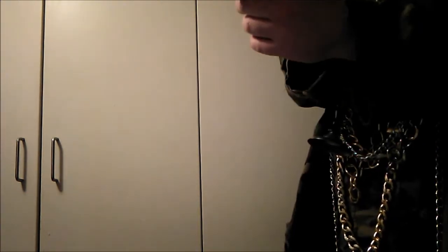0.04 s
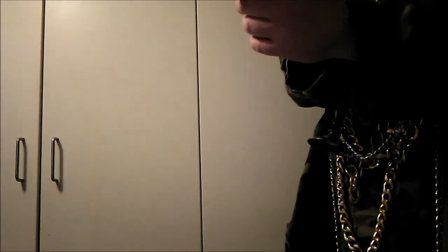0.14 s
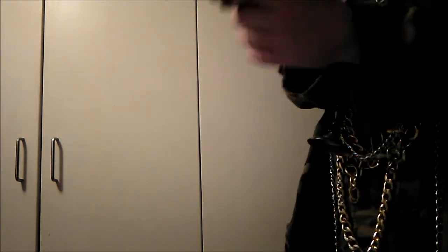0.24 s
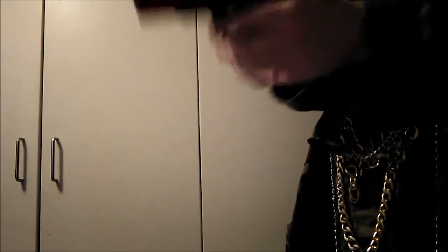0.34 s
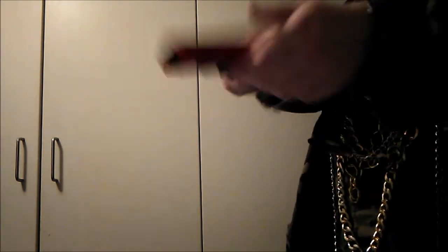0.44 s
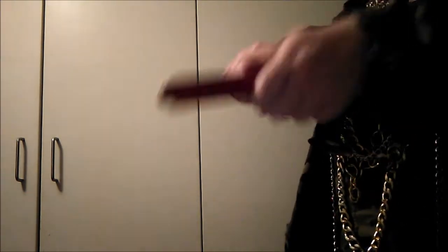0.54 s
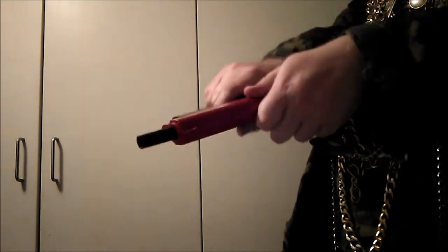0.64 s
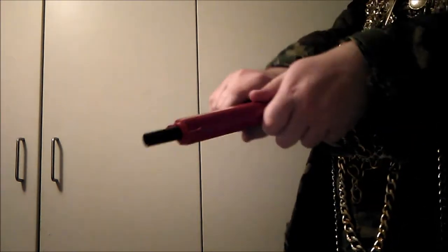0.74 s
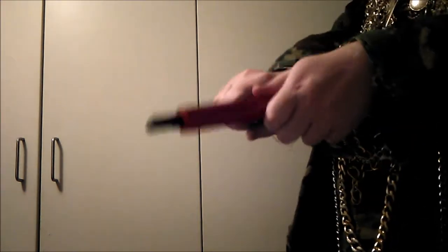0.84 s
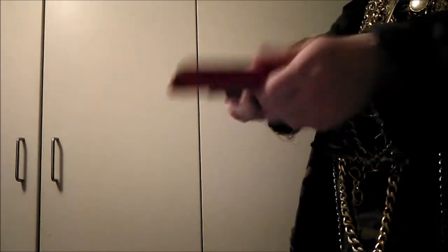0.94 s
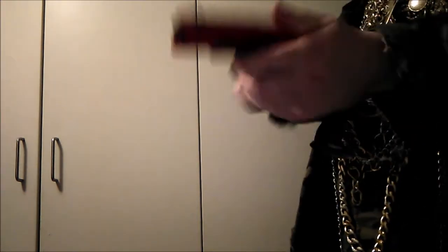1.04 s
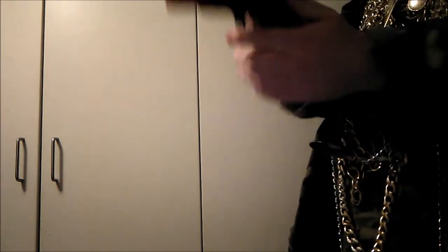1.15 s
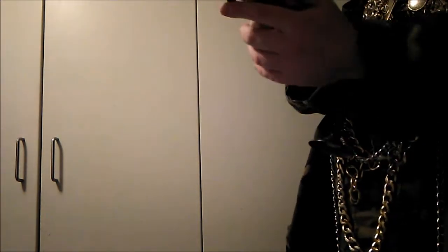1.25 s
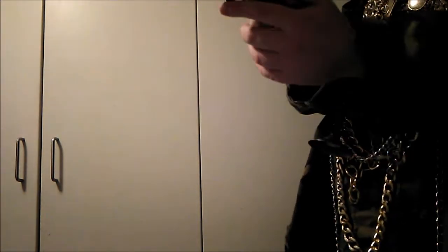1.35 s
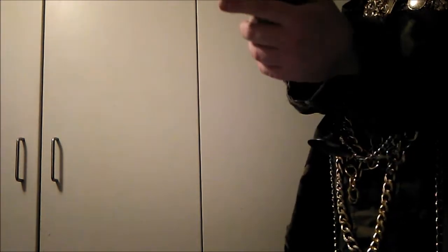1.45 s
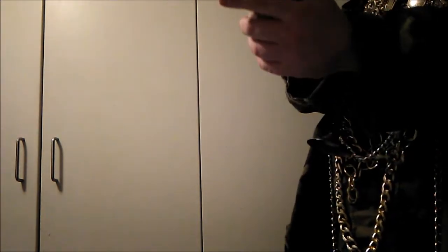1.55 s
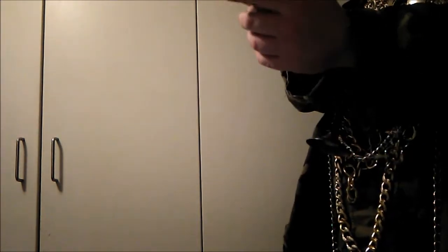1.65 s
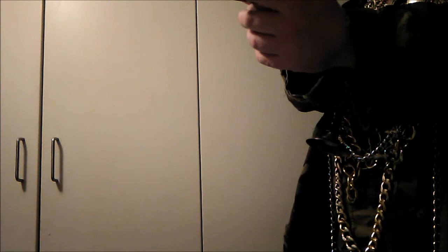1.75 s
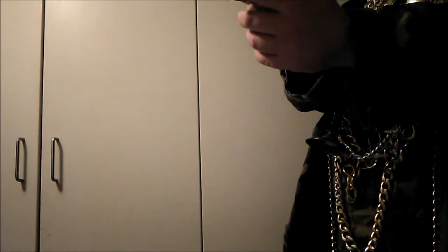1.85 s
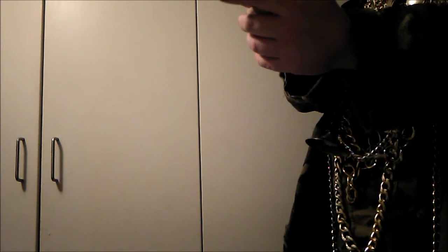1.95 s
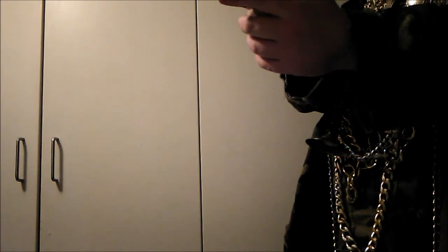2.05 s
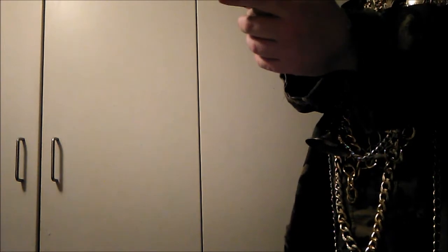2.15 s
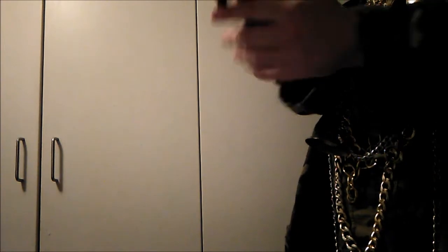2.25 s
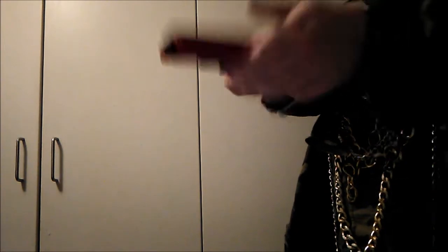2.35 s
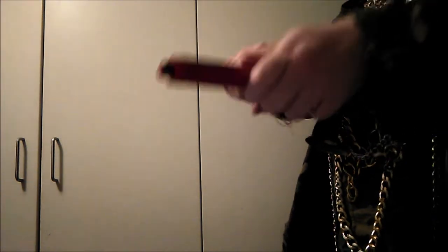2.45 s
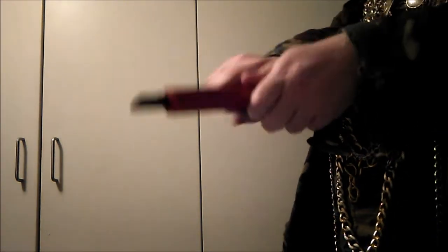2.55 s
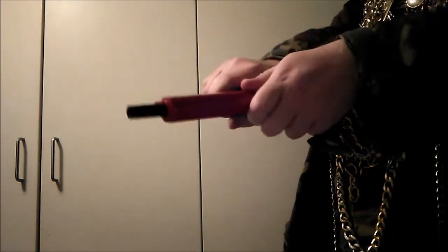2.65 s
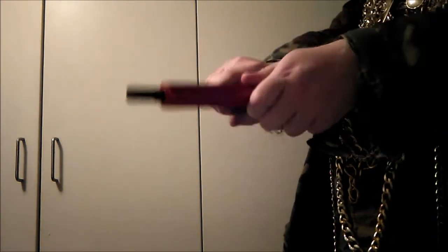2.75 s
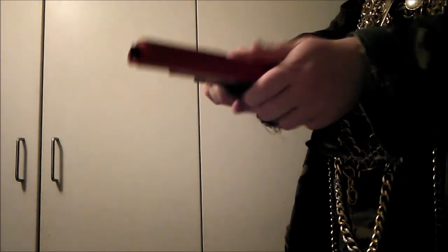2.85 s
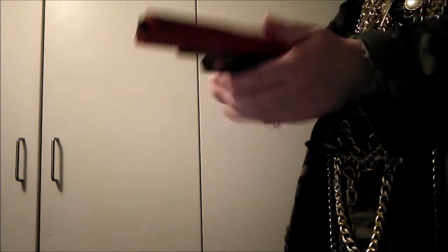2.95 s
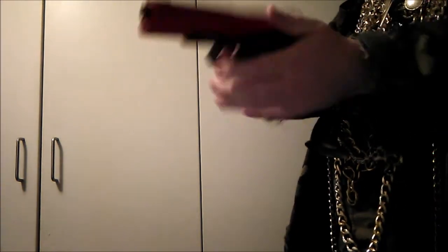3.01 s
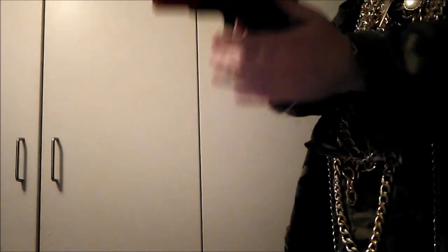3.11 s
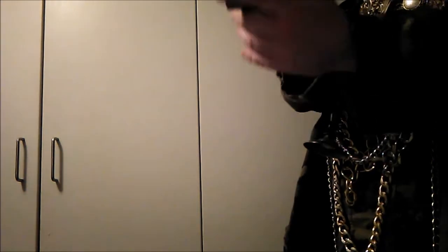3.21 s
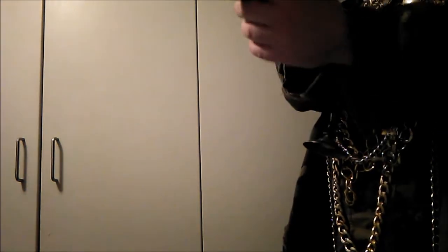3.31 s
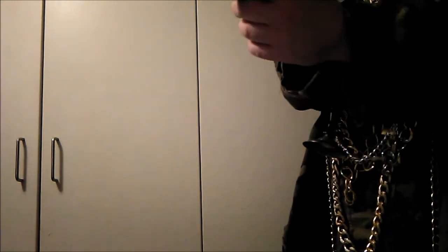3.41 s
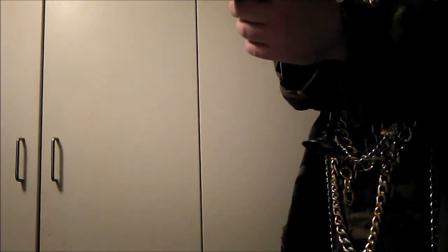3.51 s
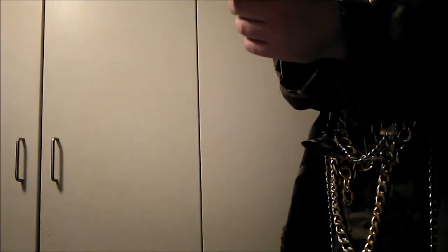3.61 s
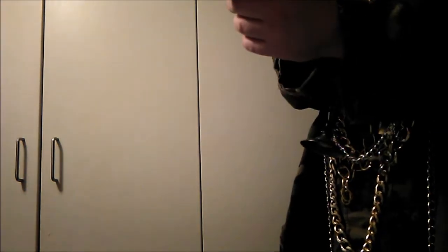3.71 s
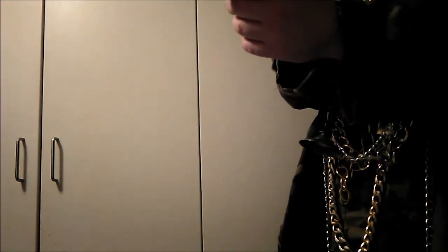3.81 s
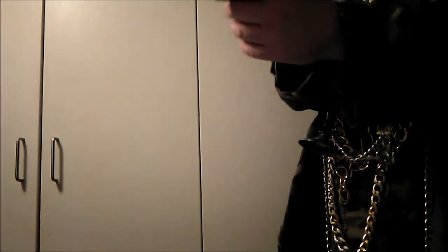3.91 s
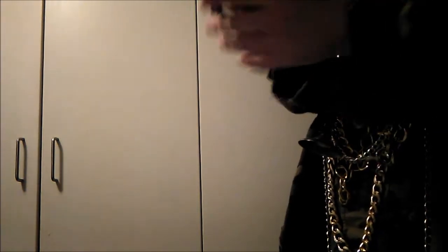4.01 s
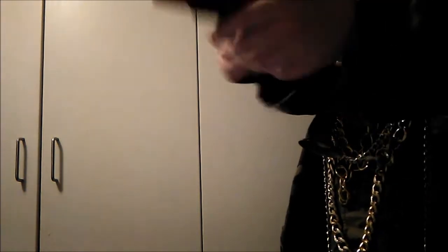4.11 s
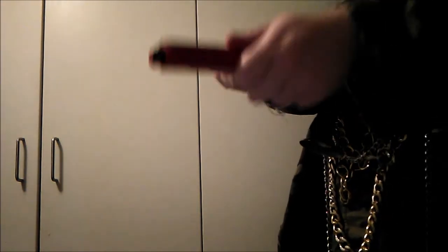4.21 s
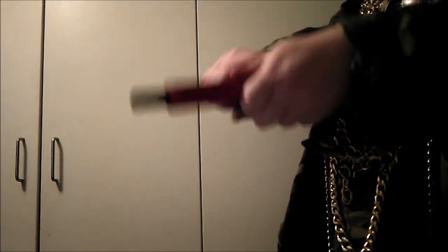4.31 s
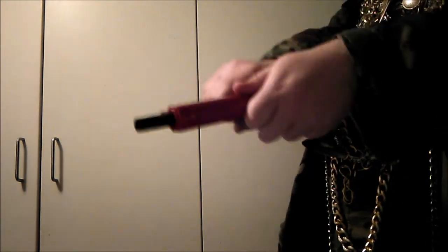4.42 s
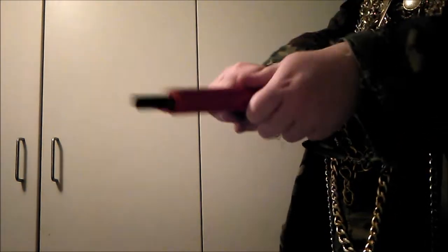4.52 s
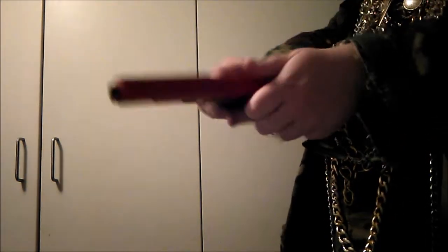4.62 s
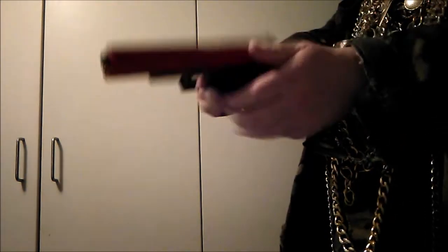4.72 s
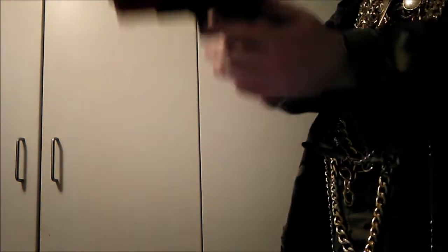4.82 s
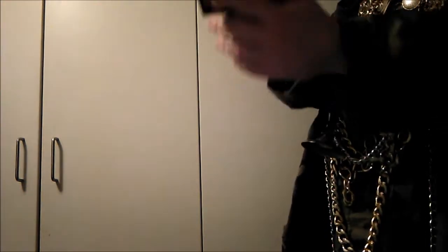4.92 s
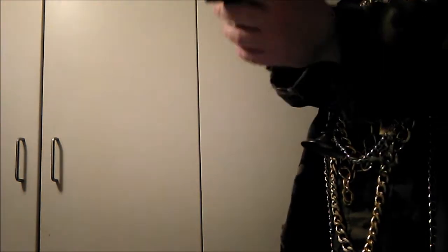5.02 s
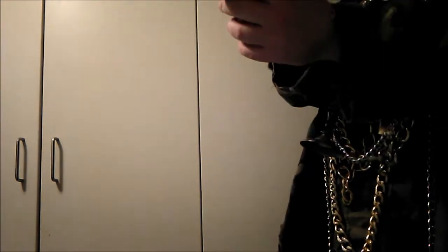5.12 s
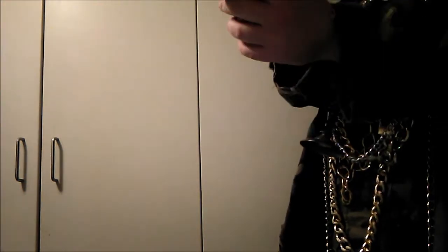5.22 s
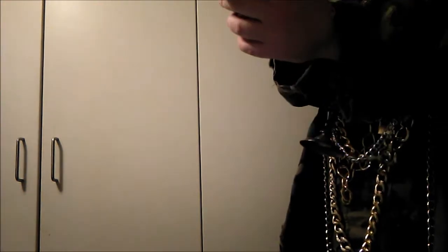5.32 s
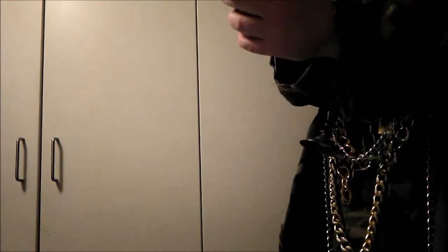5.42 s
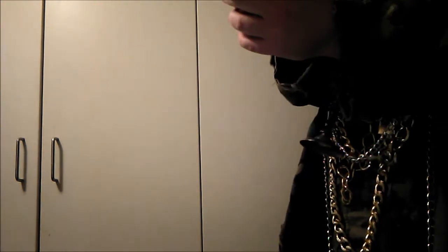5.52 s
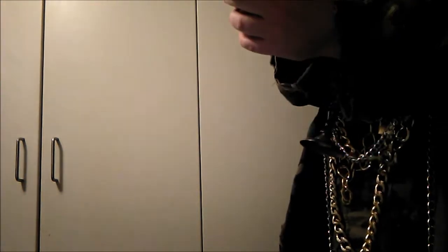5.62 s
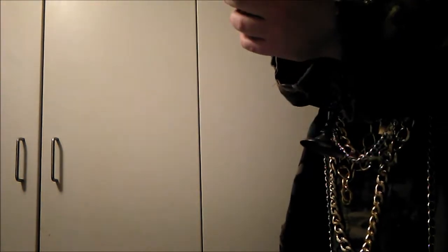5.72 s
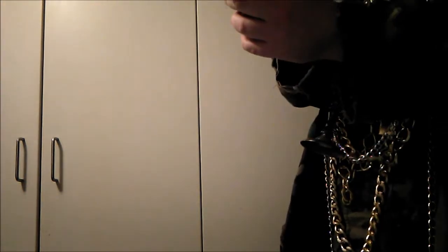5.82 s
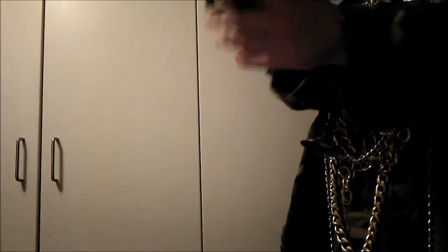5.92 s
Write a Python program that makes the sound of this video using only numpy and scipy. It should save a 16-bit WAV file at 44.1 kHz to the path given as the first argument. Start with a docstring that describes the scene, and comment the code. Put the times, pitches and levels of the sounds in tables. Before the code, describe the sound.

In a small quiet room, a plastic spring pistol is fired and cocked by hand close to a stereo pair; the gun is bright on the right, muffled on the left. Shots come at about 0.26, 2.07, 3.91 and 5.79 s: each a very short, hard rasping slam with an air puff and a tiny rising pop. About 70 ms later the pellet cracks on a panel, with a brief low thud and a more roomy tail. Between shots come blunt grip knocks, finger rubs and small rattles. The slide scrapes back and latches sharply near 0.71, 2.67 and 4.42 s, then runs home at 1.0 s, softly, and at 2.94 and 4.67 s with strong clacks. A thin spring ring follows some of these, clearest near 2.94 s. Sleeves rustle around each cocking; faint hiss, low rumble and slight hum remain. The last shot ends the scene.

```python
"""Spring airsoft pistol in a small room

Four shots are heard, with the slide cocked by hand between them. Each shot is a piston slam of coloured grains
with a puff of air and a gliding pop; the pellet's crack and the struck panel's modes follow some 70 ms later.
The plastic slide scrapes by stick and slip, latches and clatters home as bursts of noise that ring its shell.
Hands, cloth, low rumble, hum and steady noise lie beneath; a room tail, two microphones and a limiter follow."""
import sys
import numpy as np
from scipy import signal
from scipy.fft import rfft, irfft, next_fast_len
from scipy.io import wavfile
from scipy.ndimage import uniform_filter1d

SR = 44100
rng = np.random.default_rng(int(sys.argv[2]) if len(sys.argv) > 2 else 0)


def to_wav(sig):
    """Store sig (one row per channel, or 1-D mono) as 16-bit WAV at the path in sys.argv[1].

    Samples outside -1..1 are clipped; the rate is SR.
    """
    pcm = np.clip(np.atleast_2d(sig), -1, 1) * 32767
    pcm = np.round(pcm).astype(np.int16)
    wavfile.write(sys.argv[1], SR, pcm.T)  # frames by channels


N = 262836
TIME = np.arange(N) / SR   # s
BRIEF = TIME[:8192]   # time axis of one short event, s

# All levels in the tables are relative.
# piston slams: t/s, level/dB, stroke/s, tilt/(dB per octave), air puff/dB
SHOTS = [(0.2556, 4.5, 0.0058, 0.16, 13), (2.0688, 9.5, .0065, 1, 6.5), (3.9148, 6, .0068, 0, -11.5),
         (5.7934, 5.5, 0.0059, 0.5, 14.5)]
# slide pulled back to its latch: start t/s, latch t/s, final rail level/dB, rise on the way/dB,
# catch/dB, latch/dB, jolt/dB
PULLS = [(0.637, 0.7145, -28, 14, -26, -1, -19.5), (2.613, 2.672, -27.5, 19, -14.5, 1, -24.5),
         (4.359, 4.418, -28, 14.5, -13.5, 0, -29.5)]
# slide running home: start t/s, stop t/s, final rail level/dB, rise on the way/dB, clatter/dB,
# stop/dB, stop chatter/s, tilt/(dB per octave), shell/dB, jolt/dB
RETURNS = [(0.933, 1.004, -29, 24.5, -22, -16, 0.0062, -1.5, -32, -51),
           (2.911, 2.9396, -27.5, 13, -9, 13, 0.0012, 1.5, -33.5, -8.5),
           (4.639, 4.666, -21.5, 7.5, -9.5, 8, .0022, 3.5, -31.5, -21)]
# spectrum of the plastic slide's contacts: f/Hz, density level/dB
SLIDE_COLOUR = [(60, -42), (150, -21), (300, -31), (550, -19), (900, -8), (1600, -1.5), (2600, 0),
                (4000, -1.5), (6200, 0), (9500, 3.5), (11700, -4), (15000, -18)]
# modes of the slide's hollow shell: f/Hz, level/dB, t60/s
SHELL_MODES = [(650, -20, 0.059), (830, -7.5, .05), (940, -13, 0.04), (1420, -7, .045), (1970, 0, .05),
               (2190, 0, 0.061), (2593, -2.5, .04)]
# room sound at the left microphone, which faces away: f/Hz, level against the right/dB
SHADE_ROOM = [(100, -6.5), (500, 0), (1000, -1.5), (1600, -5), (2500, -8), (4000, -12.5), (9000, -14),
              (14000, -13)]
TICK_S = 0.0014   # chatter of a loose part


def from_db(db):
    """Amplitude ratio: twenty decibels are a factor of ten."""
    return 10 ** (np.asarray(db) / 20)


def at_hz(points, hz):
    """Logarithmic pitch scale: a table is read linearly in log frequency."""
    known, values = np.transpose(points)
    return np.interp(np.log(np.maximum(hz, 1)), np.log(known), values)


def add(track, s, sound):
    """Superposition: a sound is summed into a track at a time in seconds."""
    start = max(round(s * SR), 0)
    track[..., start:start + sound.shape[-1]] += sound[..., :N - start]


def colour(x, points, tilt=0, keep_power=True):
    """Minimum-phase filtering: the folded cepstrum of a tilted spectrum gives a causal response."""
    size = 2 * next_fast_len(x.shape[-1] // 2 + 2048)
    hz = np.arange(size // 2 + 1) * SR / size
    # the tilt acts mostly above 700 Hz
    gain = from_db(at_hz(points, hz) + tilt * np.log2(1 + hz / 700))
    if keep_power:
        gain = gain / np.sqrt(np.mean(gain ** 2))
    cepstrum = irfft(np.log(gain))
    cepstrum[1:size // 2] *= 2
    cepstrum[size // 2 + 1:] = 0
    response = np.exp(rfft(cepstrum))
    return irfft(rfft(x, size) * response)[..., :x.shape[-1]]


def grains(envelope, uneven_db):
    """Dense random collisions: uneven impulses carry the energy of the envelope."""
    sizes = from_db(uneven_db * rng.standard_normal(len(envelope)))
    hits = envelope * rng.standard_normal(len(envelope)) * sizes
    return hits * np.sqrt(np.sum(envelope ** 2) / np.sum(hits ** 2))


def burst(envelope, uneven_db):
    """Directional interference: row 0 is one direction, row 1 the mean of all, its notches filled in."""
    hits = grains(envelope, uneven_db)
    energy = np.sum(hits ** 2)
    spectrum = rfft(hits, 2 * len(hits))
    even = irfft(spectrum / np.sqrt(np.abs(spectrum) ** 2 + energy / 10))[:len(hits)]
    return np.array([hits, even * np.sqrt(energy / np.sum(even ** 2))])


def ring(x, modes):
    """Modal resonance: a drive is convolved with exponentially decaying sines."""
    t = TIME[:SR // 2]
    response = sum(from_db(db - 60 * t / t60) * np.sin(2 * np.pi * hz * t) for hz, db, t60 in modes)
    return signal.fftconvolve(x, response)[:N]


def chatter(length, rise):
    """Dissipative contact: the envelope of two parts that meet and buzz to rest."""
    return (1 - np.exp(-BRIEF / rise)) * np.exp(-(BRIEF / length) ** 1.1)


def wander(t, step_s):
    """Random modulation: lines join normal values of zero mean and unit spread, one per step."""
    values = rng.standard_normal(256)
    return np.interp(t / step_s, np.arange(len(values)), values)


def contact(db, length, tilt):
    """Impact noise: two plastic parts meet and chatter, 4 dB above the level given."""
    return from_db(db + 4) * colour(burst(chatter(length, rise=0.00094), uneven_db=5), SLIDE_COLOUR, tilt)


def rustle_db():
    """Incoherent addition: powers of the arm movements sum as each swells, holds and dies away."""
    # arm movements around each cocking and to take aim: t/s, length/s, rustle/dB
    moves = [(0.476, .25, -60.5), (1.05, .15, -62.5), (1.82, 0.61, -70), (2.42, .33, -59),
             (2.99, 0.16, -56.5), (3.35, 0.68, -72), (4.164, 0.81, -58.5), (5.598, .08, -73.5)]
    attack_s, release_s, still_db = .06, 0.13, -81
    power = from_db(still_db) ** 2
    for s, length, db in moves:
        before = np.maximum(s - TIME, 0) / attack_s
        after = np.maximum(TIME - s - length, 0) / release_s
        power = power + (from_db(db) * np.exp(-before - after)) ** 2
    return 10 * np.log10(power)


def hush():
    """Stationary noise: independent coloured noise at each microphone, 3 dB lower on the left."""
    # background spectrum: f/Hz, density level/dB
    hush_colour = [(20, -10), (70, -1.5), (150, 0.5), (260, -5), (520, -10.5), (1000, -14.5), (2500, -21),
                   (6000, -23.5), (15000, -25.5)]
    noise = colour(rng.standard_normal((2, N)), hush_colour)
    return from_db(-66) * noise * from_db([[-3], [0]])


def rumble():
    """Partial coherence: low noise, much alike at the two microphones, grows with movement."""
    # low pressure swells: f/Hz, density level/dB
    rumble_colour = [(20, -9.5), (45, -3.5), (75, 2), (120, -11.5), (220, -14.5), (1000, -50)]
    shared, own = rng.standard_normal(N), rng.standard_normal((2, N))
    moving_db = rustle_db()
    # the level follows a share of the rustle's swing
    level_db = -75 + 0.13 * (moving_db - moving_db.mean())
    return from_db(level_db) * colour(shared + .4 * own, rumble_colour)


def hum():
    """Amplitude modulation: a faint 68 Hz tone wavers and swells after each closing of the slide."""
    swell_after_s, swell_s = 0.12, .15
    swell = sum(np.exp(-((TIME - stop - swell_after_s) / swell_s) ** 2) for _, stop, *_ in RETURNS)
    level_db = -80.5 + 10 * swell + 7 * wander(TIME, step_s=0.6)
    return from_db(level_db) * np.sin(2 * np.pi * 68 * TIME)


def sleeves():
    """Friction noise: cloth rubs softly as the arms move."""
    # cloth spectrum: f/Hz, density level/dB
    cloth_colour = [(60, 0), (300, 0.5), (800, 1), (2800, 4.5), (6000, -1.5), (9700, 2), (15000, -11.5)]
    return colour(grains(from_db(rustle_db()), uneven_db=1.0), cloth_colour)


def faint_ticks(spread_db, tilt):
    """Random point process: tiny rattles come at 9 per second, with the strength of the movement."""
    born = rng.random(N) < 9 / SR
    over_cloth_db = 17
    sizes = born * from_db(rustle_db() + over_cloth_db + spread_db * rng.uniform(-1, 1, N))
    envelope = np.abs(signal.fftconvolve(sizes, chatter(TICK_S, rise=0.00083))[:N])
    return colour(envelope * rng.standard_normal(N), SLIDE_COLOUR, tilt)


def loose_parts():
    """Impact noise: loose parts tick as the gun is turned."""
    # ticks: t/s, level/dB, tilt/(dB per octave)
    ticks = [(0.4978, -33.5, -5.5), (0.5066, -39.5, -3), (0.841, -34, -4), (2.395, -32.5, 0.5),
             (2.4, -27.5, -1), (2.828, -36, -1.5), (3.150, -38, -2), (3.598, -37, -3), (4.170, -28, -2),
             (4.536, -29, -3), (4.5897, -34, 7), (4.901, -40, 11), (4.954, -38, 5)]
    out = np.zeros((2, N))
    for s, db, tilt in ticks:
        add(out, s, contact(db, TICK_S, tilt))
    return out


def finger_rubs():
    """Friction noise: fingers stroke the plastic with a half-sine envelope."""
    # rubs: t/s, length/s, level/dB, tilt/(dB per octave)
    rubs = [(0.596, 0.039, -49, 13), (2.42, .04, -42.5, 6), (2.446, 0.029, -46.5, -5.5),
            (3.121, 0.088, -46, 20), (4.167, 0.042, -39, 0), (4.915, 0.04, -55.5, 5)]
    out = np.zeros((2, N))
    for s, length, db, tilt in rubs:
        stroke = np.sin(np.pi * np.minimum(BRIEF / length, 1))
        add(out, s, from_db(db) * colour(burst(stroke, uneven_db=1), SLIDE_COLOUR, tilt))
    return out


def grips():
    """Impulsive excitation: hands knock bluntly, the palm thuds and the hollow shell rings."""
    # knocks: t/s, level/dB, chatter/s, tilt/(dB per octave), shell/dB, palm thud/dB
    knocks = [(0.6295, -20.5, .0028, -2, -45.5, -57.5), (1.249, -42, .016, -9, -44.5, -50),
              (1.794, -59.5, .022, -13, -60, -59.5), (2.344, -52, .0067, -7, -61, -72),
              (2.564, -33, .005, -6, -48, -57), (2.614, -36.5, .005, -4, -55.5, -67),
              (2.775, -38.5, .0042, -3.5, -56, -68.5), (2.85, -55.5, .011, -22, -60.5, -69),
              (4.227, -43.5, .013, -6.5, -63, -44.5), (4.26, -42.5, .008, -2.5, -62, -52),
              (4.315, -43, .0055, -6, -56.5, -63)]
    # dull palm spectrum: f/Hz, density level/dB
    palm_colour = [(60, -12), (160, -2), (260, 2.5), (500, -4), (900, -15.5), (3000, -40.5)]
    out, blows = np.zeros((2, N)), np.zeros(N)
    for s, db, length, tilt, shell_db, palm_db in knocks:
        add(out, s, contact(db, length, tilt))
        thud = burst(chatter(length=0.012, rise=0.0012), uneven_db=2.5)
        add(out, s, from_db(palm_db) * colour(thud, palm_colour))
        add(blows, s, from_db([shell_db]))
    return out + ring(blows, SHELL_MODES)


def springs():
    """Free vibration: coil springs, under load or as the slide closes, sing thin wavering tones."""
    # twangs: t/s, f/Hz, level/dB, t60/s
    twangs = [(.714, 1502, -56, .7), (2.672, 1502, -52.5, .8), (2.937, 2775, -34.5, 0.44),
              (4.499, 1520, -51.5, 0.4)]
    out, t = np.zeros(N), TIME[:SR]
    for s, hz, db, t60 in twangs:
        level_db = db - 60 * t / t60 + 4 * wander(t, step_s=0.016)
        onset = 1 - np.exp(-t / 0.012)
        add(out, s, from_db(level_db) * onset * np.sin(2 * np.pi * hz * t))
    return out


def jolts(hz, decay_s):
    """Damped oscillation: a hard stop of the slide shoves the gun in the hands, one low swing."""
    out = np.zeros(N)
    for _, s, *_, db in PULLS + RETURNS:
        add(out, s, from_db(db) * np.sin(2 * np.pi * hz * BRIEF) * np.exp(-BRIEF / decay_s))
    return out


def scrape(length, last_db, swell_db):
    """Stick-slip friction: the slide grates along its rails, louder as it goes."""
    rise_db = np.interp(BRIEF, [0, length], [last_db - swell_db, last_db])
    force_db = rise_db + 0.5 * wander(BRIEF, step_s=0.00091)
    release = np.exp(-np.maximum(BRIEF - length, 0) / 0.0055)
    return colour(burst(from_db(force_db) * release, uneven_db=3.5), SLIDE_COLOUR, tilt=-2.5)


def slide_back():
    """Friction-driven resonance: the pull scrapes, catches and latches; the scraping rings the shell."""
    # three catches of the piston on its way to the sear: time before the latch/s
    catches_before_latch = [.027, .0182, .0108]
    rails, out = np.zeros((2, N)), np.zeros((2, N))
    for start, latch, rail_db, swell_db, catch_db, latch_db, _ in PULLS:
        add(rails, start, scrape(latch - start, rail_db, swell_db))
        for early in catches_before_latch:
            add(out, latch - early, contact(catch_db, length=0.0011, tilt=-.5))
        add(out, latch, contact(latch_db, length=0.0023, tilt=3.8))
    return out + rails + ring(from_db(-50) * rails[1], SHELL_MODES)


def slide_home():
    """Impulsive excitation: the slide scrapes, clatters and stops; every blow rings its shell."""
    # blows on the guides: share of the time from start to stop
    clatter_shares = [.36, .57, .77]
    out, blows = np.zeros((2, N)), np.zeros(N)
    for start, stop, rail_db, swell_db, clatter_db, stop_db, length, tilt, shell_db, _ in RETURNS:
        add(out, start, scrape(stop - start, rail_db, swell_db))
        for share in clatter_shares:
            s = start + share * (stop - start)
            add(out, s, contact(clatter_db, 0.0032, tilt))
            add(blows, s, from_db([-43.5]))
        add(out, stop, contact(stop_db, length, tilt))
        add(blows, stop, from_db([shell_db]))
    return out + ring(blows, SHELL_MODES)


def frame_ring(x):
    """Modal resonance: the gun's sound drives short ringing of its plastic frame."""
    # frame modes: f/Hz, level/dB, t60/s
    frame_modes = [(440, -50.5, 0.027), (577.6, -55.5, 0.21), (995, -52.5, 0.031), (1397, -57.5, 0.067),
                   (1592, -56.5, 0.2), (1960, -58.5, 0.21), (2270, -56.5, 0.064), (2660, -60.5, 0.13),
                   (3420, -54.5, 0.071), (4505, -56.5, .08), (5000, -58, 0.094), (9100, -55, 0.031),
                   (9400, -50.5, 0.08)]
    return ring(x, frame_modes)


def pellet():
    """Impact and modal response: the pellet crumples into the target and its panel thuds."""
    # impacts: t/s, crack/dB, crumple/s, tilt/(dB per octave), thud/dB
    impacts = [(0.325, -9, 0.0062, 1.1, -28), (2.137, -24.5, 0.012, -1, -17), (2.1433, -9, 0.0041, 8, -24),
               (3.9817, -13.5, .0015, -0.5, -40), (3.987, -7, 0.0063, 0.26, -29.5),
               (5.8656, -8.5, 0.0054, 4, -30.5)]
    # crack spectrum: f/Hz, density level/dB
    crack_colour = [(60, -40), (150, -2.5), (270, -5), (600, -2.5), (950, 0.5), (1500, 3), (2700, 6.5),
                    (4200, 0.5), (7000, -2), (9700, 3.5), (11700, -6), (15000, -22)]
    # panel modes: f/Hz, level/dB, t60/s
    panel_modes = [(227.7, -21, 0.3), (260, -7.5, 0.1), (364, -5.5, 0.035), (443, -23, .05),
                   (556, -14.5, 0.065)]
    crack, push = np.zeros((2, N)), np.zeros(N)
    for s, db, crumple, tilt, thud_db in impacts:
        crumpling = burst(chatter(crumple, rise=0.0019), uneven_db=4)
        add(crack, s, from_db(db) * colour(crumpling, crack_colour, tilt))
        add(push, s, from_db([thud_db]))
    return crack + ring(push, panel_modes)


def rebounds(delay_s, rebound_db, length, tilt):
    """Elastic rebound: the piston bounces on its spring and taps again after each shot."""
    out = np.zeros((2, N))
    for s, *_ in SHOTS:
        add(out, s + delay_s, contact(rebound_db, length, tilt))
    return out


def muzzle_pop(first_hz, last_hz, glide_s, decay_s, pop_db):
    """Air-column oscillation: air leaving the barrel swings for a few quickening cycles."""
    out = np.zeros(N)
    hz = np.interp(BRIEF, [0, glide_s], [first_hz, last_hz])
    phase = 2 * np.pi * np.cumsum(hz) / SR
    swell = (BRIEF / decay_s) ** 2 * np.exp(-BRIEF / decay_s)
    for s, db, *_ in SHOTS:
        add(out, s, from_db(db + pop_db) * swell * np.sin(phase))
    return out


def piston():
    """Friction, impact and flow: the piston rasps to a dead stop and air swells from the muzzle."""
    # piston spectrum: f/Hz, density level/dB
    piston_colour = [(60, -20), (140, 0), (240, 5.5), (340, -5.5), (460, -1.5), (700, -6), (980, -3.5),
                     (1500, -6), (2600, -5.5), (4800, 3), (7000, -3), (9500, 3.5), (11700, -5.5),
                     (15000, -16)]
    slam, air = np.zeros((2, N)), np.zeros(N)
    for s, db, stroke, tilt, air_db in SHOTS:
        rasp = 1 - np.exp(-BRIEF / 0.00058)
        stop = np.exp(-np.maximum(BRIEF - stroke, 0) / .001)
        add(slam, s, from_db(db) * colour(burst(rasp * stop, uneven_db=-3), piston_colour, tilt))
        puff = (1 - np.exp(-BRIEF / 0.00029)) * np.exp(-BRIEF / 0.002)
        add(air, s + stroke, -from_db(air_db) * puff)
    # no steady pressure passes the high-pass, so the puff swings back
    return slam, signal.sosfilt(signal.butter(1, 75, "high", fs=SR, output="sos"), air)


def room(x, build_s):
    """Diffuse reverberation: reflections thicken, then die band by band, apart at each microphone."""
    # wall return: f/Hz, level/dB
    wall_colour = [(60, -8.5), (250, -8), (500, 1.5), (1000, 4), (2000, 2.5), (4000, 1), (9000, -0.5),
                   (15000, 0.5)]
    # decay: f/Hz, t60/s
    decay_times = [(100, 0.17), (500, 0.21), (1500, 0.2), (4000, 0.26), (9000, 0.23), (15000, .2)]
    t = TIME[:SR // 2]
    white = rfft(rng.standard_normal((2, len(t))))
    hz = np.arange(white.shape[1]) * SR / len(t)
    edges = np.append(0, np.geomspace(150, SR / 2, 12))
    tail = np.zeros((2, len(t)))
    for low, high in zip(edges, edges[1:]):
        band = irfft(white * ((hz >= low) & (hz < high)), len(t))
        tail += band * from_db(-60 * t / at_hz(decay_times, (low + high) / 2))
    tail = tail * (1 - np.exp(-t / build_s))
    tail = tail / np.sqrt(np.sum(tail ** 2, axis=1)[:, None])
    left, right = colour(tail, wall_colour, keep_power=False)
    left = colour(left, SHADE_ROOM, keep_power=False)
    return np.array([signal.fftconvolve(x, side)[:N] for side in (left, right)])


def scene():
    """Direct and reverberant fields: the pistol is near and mostly dry, the target far and reverberant."""
    # direct sound at the left microphone, which faces away: f/Hz, level against the right/dB
    shade_direct = [(100, -13.5), (300, -8.5), (500, -6), (1000, -5.5), (1600, -11.5), (2500, -17),
                    (4000, -23), (9000, -23), (14000, -32)]
    slam, air = piston()
    gun = slam + rebounds(delay_s=.057, rebound_db=-25, length=0.0036, tilt=-1)
    gun = gun + slide_back() + slide_home() + jolts(hz=129, decay_s=0.001)
    gun = gun + grips() + finger_rubs() + loose_parts() + faint_ticks(spread_db=4, tilt=0)
    gun, gun_all_round = gun + frame_ring(gun[1]) + springs()
    impact, impact_all_round = pellet()
    cloth = sleeves()
    pop = muzzle_pop(first_hz=251, last_hz=1126, glide_s=0.0018, decay_s=0.0013, pop_db=-9.0)

    near = gun + cloth * from_db(-0.5)
    shaded = colour(near, shade_direct, keep_power=False) + colour(impact, SHADE_ROOM, keep_power=False)
    # the left lags by 7 samples; the puff reaches the right only, the pop both alike
    direct = np.array([np.roll(shaded, 7), near + impact + air]) + pop
    radiated = from_db(-10.0) * gun_all_round + from_db(-25) * pop
    radiated = radiated + from_db(3.5) * impact_all_round + from_db(-2.0) * cloth
    return direct + room(radiated, build_s=0.0017) + hush() + rumble() + hum()


def released(over_db, db_per_s):
    """Peak detection: gain reduction jumps up at once and falls at a steady rate."""
    return np.maximum.accumulate(np.maximum(over_db, 0) + db_per_s * TIME) - db_per_s * TIME


def limiter(x, ceiling_db, hold_s, db_per_s):
    """Linked gain control: both channels duck under a loud peak and recover after a short hold."""
    level_db = 20 * np.log10(np.abs(x).max(axis=0) + 1e-9)
    cut_db = released(level_db - ceiling_db, db_per_s)
    cut_db = np.maximum(cut_db, np.interp(TIME - hold_s, TIME, cut_db))
    return x * from_db(-uniform_filter1d(cut_db, size=24))


def blast_guard(x, threshold_db, db_per_s):
    """Band-triggered gain control: a strong blast below 90 Hz turns its own channel down for a while."""
    bass = signal.sosfilt(signal.butter(2, 90, fs=SR, output="sos"), x)
    level_db = 20 * np.log10(np.abs(bass) + 1e-9)
    cut_db = np.array([released(side_db - threshold_db, db_per_s) for side_db in level_db])
    return x * from_db(-cut_db)


def record(dry):
    """Nonlinear transmission: limiter, bass guard, rounded peaks and a steep top cut."""
    limited = limiter(dry, ceiling_db=-1, hold_s=0.019, db_per_s=450.5)
    guarded = blast_guard(limited, threshold_db=-23.5, db_per_s=11)
    rounded = .8 * np.tanh(guarded / .8)
    # 60 dB down from 16.9 kHz upward
    return signal.sosfilt(signal.cheby2(14, 60, 16900, fs=SR, output="sos"), rounded)


dry = scene()
out = record(dry)
to_wav(out)
```